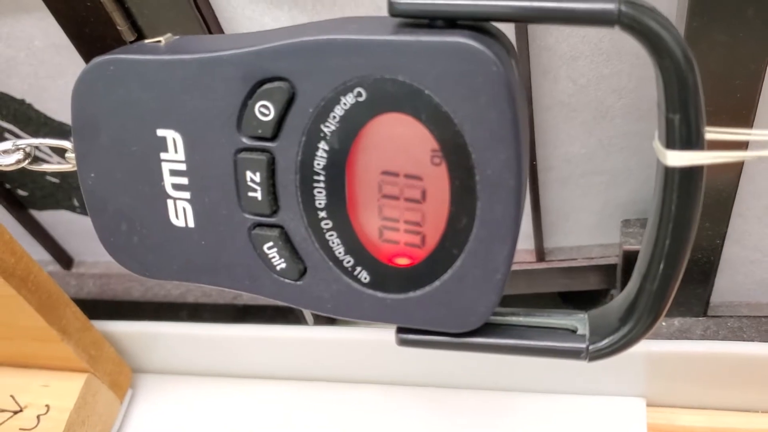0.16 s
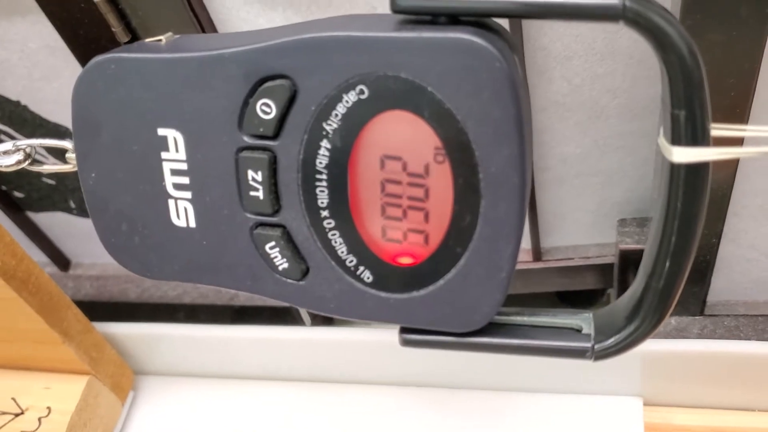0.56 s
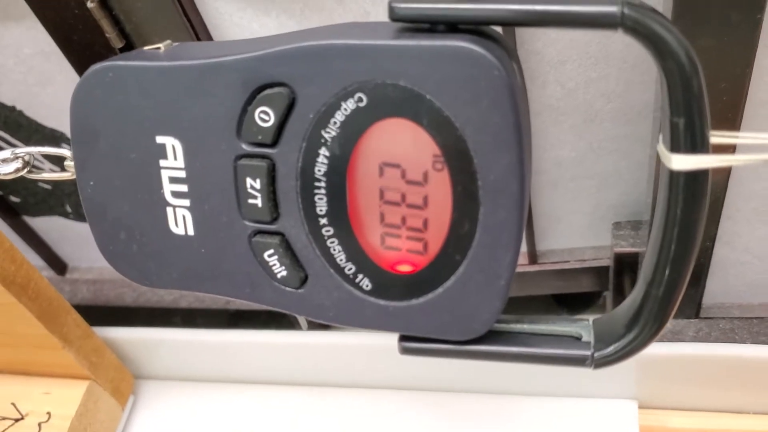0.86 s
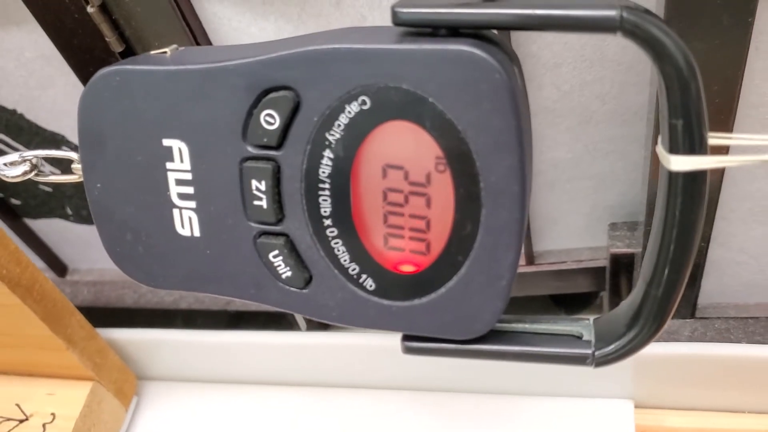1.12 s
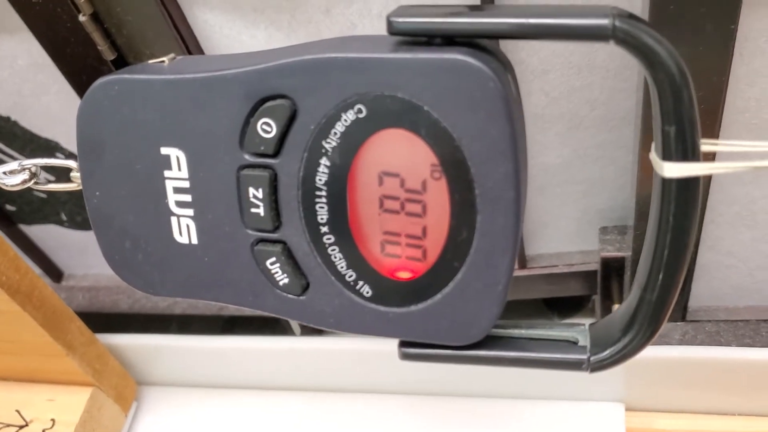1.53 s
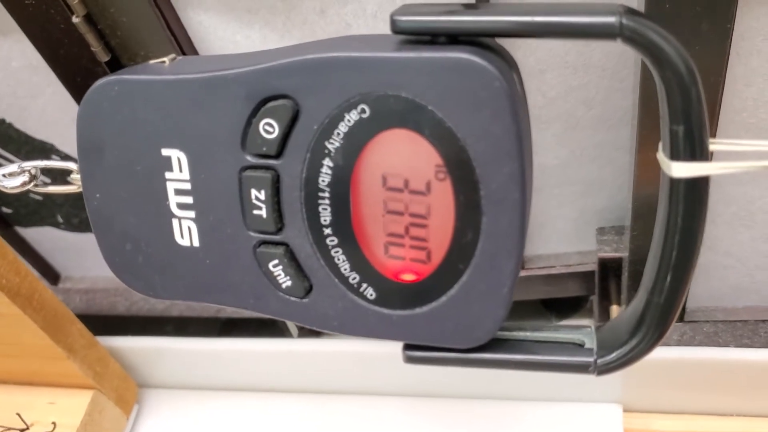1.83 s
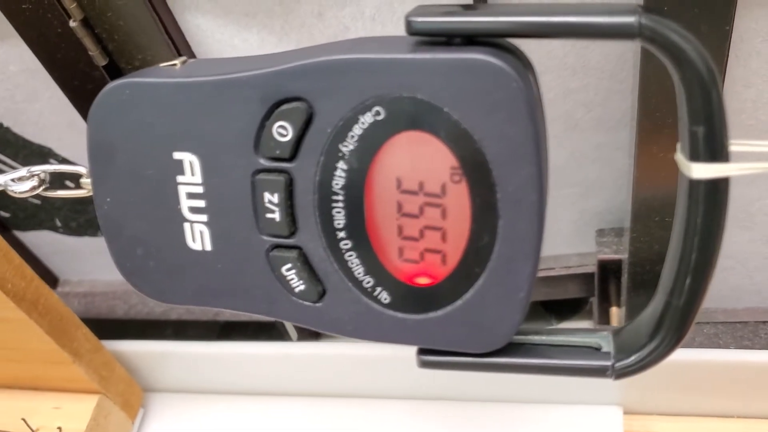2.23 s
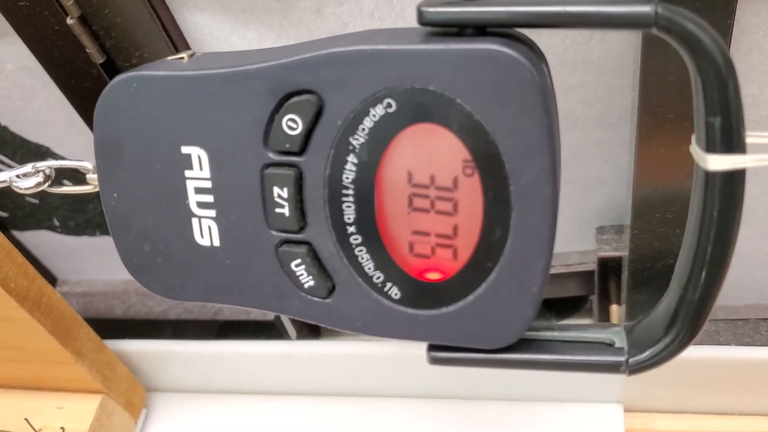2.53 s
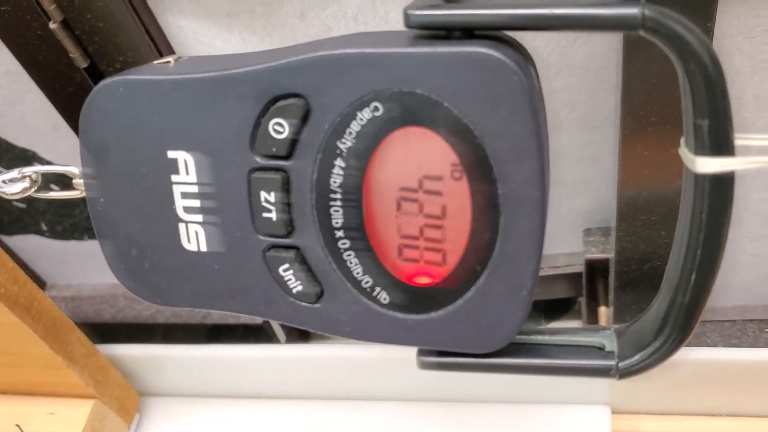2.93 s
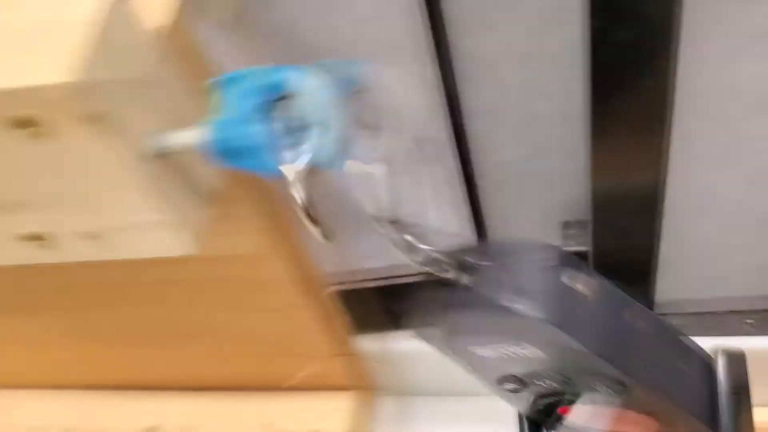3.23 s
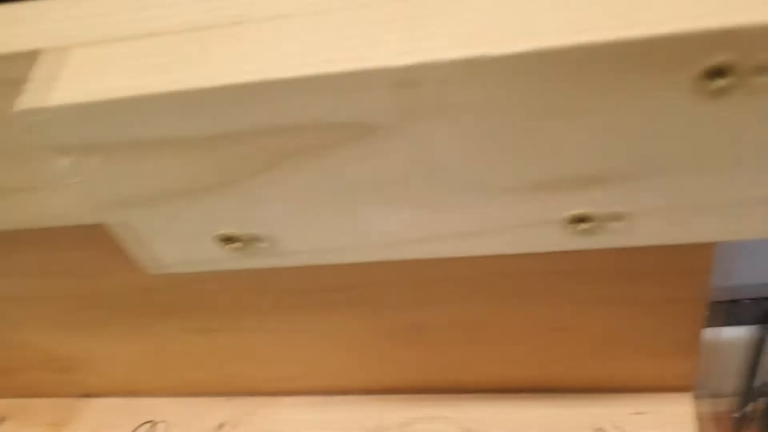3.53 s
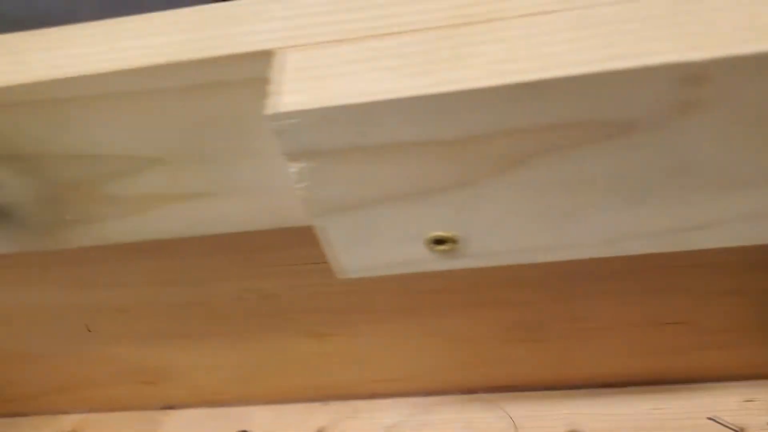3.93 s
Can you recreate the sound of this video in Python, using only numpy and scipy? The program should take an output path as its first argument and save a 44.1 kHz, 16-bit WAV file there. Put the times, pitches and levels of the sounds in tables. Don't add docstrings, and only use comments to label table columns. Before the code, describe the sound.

Close stereo pickup in a small workshop with steady low ventilation hum. A line under growing tension gives faint ticks, creaks and small metallic pings. Just before three seconds it parts with a bright, dry crack; a hanging scale, hook and chain then knock rapidly against a wooden frame, with a second heavy cluster, a late sharp click and soft final taps. The background hum dips after the snap.

```python
import sys
import numpy as np
from scipy import signal
from scipy.fft import rfft, irfft, next_fast_len
from scipy.io import wavfile

SR = 44100
rng = np.random.default_rng(int(sys.argv[2]) if len(sys.argv) > 2 else 0)


def boost_factor(decibels):
    exponent = np.asarray(decibels, float) / 20
    return 10 ** exponent


def transcribe(u):
    v = np.clip(np.atleast_2d(u).T, -1, 1)
    q = np.round(v * 32767).astype(np.int16)
    wavfile.write(sys.argv[1], SR, q)


N = 179433


def rms_one(x):
    return x / np.sqrt(np.mean(x ** 2) + 1e-20)


def at_hz(points, hz):
    table_hz, value = np.transpose(points)
    return np.interp(np.log(np.maximum(hz, 1)), np.log(table_hz), value)


def add(out, sound, s, pan_db):
    i = round(s * SR)
    sound = sound[:, :N - i]
    sides = boost_factor(np.array([[pan_db / 2], [-pan_db / 2]]))
    out[:, i:i + sound.shape[1]] += sound * sides


# f/Hz, left-right correlation [-1..1]
FIELD_LIKENESS = [(60, 0.93), (180, 0.98), (550, 0.58), (1650, 0.04), (4970, 0.05), (15000, -0.14)]


def stereo_noise(gain_at, alike_at=lambda hz: at_hz(FIELD_LIKENESS, hz)):
    size = next_fast_len(N)
    hz = np.arange(size // 2 + 1) * SR / size
    mid, side = rfft(rng.standard_normal((2, size)))
    alike = np.clip(alike_at(hz), -1, 1)
    pair = np.sqrt(1 + alike) * mid + np.sqrt(1 - alike) * side * [[1], [-1]]
    return rms_one(irfft(pair * gain_at(hz), size)[:, :N])


# f/Hz, density level/dB
AIR_SPECTRUM = [(15, -63), (25, -11.5), (70, -3.5), (124, -8.5), (159, -16.5), (221, -23), (391, -28),
                (447, -24), (630, -28.5), (872, -33), (1140, -32.5), (1230, -33), (2400, -58.5),
                (3120, -109), (5280, -120)]
# f/Hz, density level/dB
OUTLET_HISS = [(1200, -43), (2000, -7.5), (3200, -6), (3700, -11.5), (5200, -10.5), (5900, -2), (7300, -3),
               (8500, 0.5), (9500, -4.5), (10200, -14.5), (14000, -12.5), (16000, -17)]
# f/Hz, bandwidth/Hz, rms level/dB, tone share [0..1]
DUCT_BOOMS = [(59.07, 7.7, -44.5, 0.22), (72.37, 2.6, -47, 0.78), (154.5, 14.6, -52.5, 0.02),
              (200, 7.7, -76.5, 0.37)]
# f/Hz, rms level/dB
MOTOR_TONES = [(360.7, -68.5), (452.2, -62.5), (527.6, -69.5), (720, -71.5), (904.4, -71.5), (1200, -67.5),
               (1319, -69.5)]


def ventilation():
    t = np.arange(N) / SR
    out = boost_factor(-46) * stereo_noise(lambda hz: boost_factor(at_hz(AIR_SPECTRUM, hz)))
    out += boost_factor(-71) * stereo_noise(lambda hz: boost_factor(at_hz(OUTLET_HISS, hz)))
    for centre, width, db, tone in DUCT_BOOMS:
        steady = np.sqrt(2) * np.sin(2 * np.pi * (centre * t + rng.random()))
        waver = stereo_noise(lambda hz: 1 / (1 + (2 * (hz - centre) / width) ** 2))
        out += boost_factor(db) * (np.sqrt(tone) * steady + np.sqrt(1 - tone) * waver)
    for centre, db in MOTOR_TONES:
        phase = rng.random((2, 1)) * 0.74
        steady = np.sqrt(2) * np.sin(2 * np.pi * (centre * t + phase))
        waver = stereo_noise(lambda hz: 1 / (1 + ((hz - centre) / 3.5) ** 2))
        out += boost_factor(db) * (0.39 * steady + 0.61 * waver)
    return out * boost_factor([[-.4], [.4]])


# t/s, depth/dB, attack/s
GAIN_DUCKS = [
    (2.885, 6.5, .016),
    (3.05, 15.5, 0.2),
    (3.52, 15.5, 0.19),
    (3.81, 16.5, 0.027),
]


def gain_db():
    rest_db, release_db_per_s = 1.0, 13.5
    t = np.arange(N) / SR
    ducks = []
    for s, depth_db, attack_s in GAIN_DUCKS:
        sinking = depth_db * (t - s) / attack_s
        recovering = depth_db - release_db_per_s * (t - s - attack_s)
        ducks.append(np.minimum(sinking, recovering))
    return rest_db - np.maximum(np.max(ducks, axis=0), 0)


# f/Hz, T60/s
WORKSHOP_T60 = [(150, 0.46), (700, 0.66), (3000, 0.29), (9000, 0.31), (16000, 0.25)]


def room(x):
    t, tail = np.arange(SR // 2) / SR, 0
    for low in 100 * 2. ** np.arange(8):
        band = signal.butter(2, [low, min(2 * low, .45 * SR)], "band", fs=SR, output="sos")
        noise = signal.sosfilt(band, rng.standard_normal((2, len(t))))
        tail = tail + noise * boost_factor(-60 * t / at_hz(WORKSHOP_T60, low * np.sqrt(2)))
    tail = tail * np.clip(t / 0.0013, 0, 1)
    tail = boost_factor(-9.5) * tail / np.sqrt(np.sum(tail ** 2) / 2)
    return signal.fftconvolve(x, tail, axes=1)[:, :N]


# f/Hz, density level/dB
ANSWER_COLOUR = [(180, -41), (300, -9.5), (870, -2), (1840, -14), (2280, -7), (2650, -7.5), (3950, -7),
                 (13800, -3.5), (16000, -10.5)]
ANSWER_S = 2.894


def crack_answer():
    swell_s, hold_s, fade_s = 0.03, 0.047, 0.21
    start_db, top_db, hold_loss_db = -35, -24, 3
    fade_db_per_s, cut_db_per_s = 103.5, 396.5
    held_db = top_db - hold_loss_db
    faded_db = held_db - fade_db_per_s * fade_s
    s = ANSWER_S + np.cumsum([-.003, .003, swell_s, hold_s, fade_s, 1])
    corners_db = [-100, start_db, top_db, held_db, faded_db, faded_db - cut_db_per_s]
    level_db = np.interp(np.arange(N) / SR, s, corners_db)
    wash = stereo_noise(lambda hz: boost_factor(at_hz(ANSWER_COLOUR, hz)), lambda hz: 0.083 + 0 * hz)
    return boost_factor(level_db) * wash


def burst(length_ms, alike, swell, size=12000):
    t = np.arange(size) / SR / (length_ms / 1000)
    shared, left, right = rng.standard_normal((3, size))
    noise = np.sqrt(alike) * shared + np.sqrt(1 - alike) * np.array([left, right])
    return noise * (4 * t) ** swell * np.exp(-4 * t)


def contacts(table, width, alike, swell):
    near, far = np.zeros((2, 2, N))
    for s, db, hz, length_ms, pan_db in table:
        octaves = max(width[0] + width[1] * (db + 30), 0.079)
        edges = np.clip(hz * 2 ** (np.array([-.5, .5]) * octaves), 30, .49 * SR)
        band = signal.butter(2, edges, "band", fs=SR, output="sos")
        sound = signal.sosfilt(band, burst(length_ms, alike, swell))
        sound = boost_factor(db + 4.0) * sound / np.abs(sound).max()
        click = rms_one(signal.sosfilt(band, np.arange(sound.shape[1]) == 0))
        click = click * np.sqrt(np.mean(sound ** 2))
        add(near, sound, s, pan_db)
        add(far, np.array([click, click]), s, pan_db / 2)
    return near, far


# t/s, peak level/dB, centre f/Hz, length/ms, left-right difference/dB
RIG_CREAKS = [
    (.720, -44.5, 1200, 7.1, 3),
    (.728, -62.5, 1900, 23, 5),
    (1.259, -63, 2100, 3, 11),
    (1.296, -72, 2300, 43, 10),
    (1.299, -54.5, 2200, 3.7, 11),
    (2.346, -65, 4550, 12, 3),
]
# t/s, peak level/dB, centre f/Hz, length/ms, left-right difference/dB
METAL_PINGS = [
    (.832, -56.5, 3520, 5.7, 9),
    (.937, -68, 2000, 5, 7),
    (1.08, -69, 2200, 5.8, 12),
    (1.69, -60, 1510, 9.4, 2),
    (2.345, -56.5, 8660, 8.2, -2),
    (2.345, -64, 14500, 14, -2),
    (2.53, -70, 15000, 18, 0),
    (2.594, -49, 3030, 15, 1),
    (2.595, -60, 5550, 4.8, 11),
]
# t/s, peak level/dB, centre f/Hz, length/ms, left-right difference/dB
KNOT_SLIPS = [
    (.829, -68, 6140, 95, 19),
    (.8315, -48.5, 8200, 2, 15),
    (2.345, -63.5, 5500, 14, 5),
]
# t/s, peak level/dB, centre f/Hz, length/ms, left-right difference/dB
LINE_SQUEALS = [
    (2.15, -80, 2310, 310, 14),
    (2.66, -76.5, 2310, 230, 7),
]


def straining_rig():
    parts = [(RIG_CREAKS, (0.6, 0)), (METAL_PINGS, (0.17, 0)), (KNOT_SLIPS, (6.2, 0.11)),
             (LINE_SQUEALS, (.05, 0))]
    return np.sum([contacts(table, width, alike=0.12, swell=1.76) for table, width in parts], axis=0)


# t/s, peak level/dB, centre f/Hz, length/ms, left-right difference/dB
DULL_THUMPS = [
    (2.887, -37, 256, 14, 0),
    (2.893, -40, 82.5, 50, 0),
    (2.96, -35, 184, 91, 0),
    (3.05, -37, 78, 120, 0),
    (3.1, -45.5, 165, 53, 0),
    (3.40, -40.5, 255, 43, 0),
    (3.43, -42, 87, 44, 0),
    (3.5, -49.5, 180, 140, 0.018),
    (4.02, -54, 175, 52, 0),
]


def thumps():
    return contacts(DULL_THUMPS, (1.78, 0.063), alike=0.97, swell=1.18)[0]


# t/s, rms level/dB
FRAME_JOLTS = [
    (2.9, -45),
    (3.05, -40),
    (3.22, -42.5),
    (3.3, -41.5),
    (3.38, -46.5),
    (3.5, -45.5),
    (3.82, -54.5),
]


def shudder_db():
    rise_db_per_s, fall_db_per_s = 87, 76
    t = np.arange(N) / SR
    jolts = [db - np.maximum(rise_db_per_s * (s - t), fall_db_per_s * (t - s)) for s, db in FRAME_JOLTS]
    return np.where(t > ANSWER_S, np.max(jolts, axis=0), -200)


# f/Hz, level under blows/dB, level under shudder/dB, T60/s
FRAME_MODES = [(188, -15, -5.5, 0.065), (232, -22.5, -10, 0.11), (324.4, -23, -13, 0.095),
               (540, -21.5, -21.5, 0.052), (578, -10, -5.5, 0.14), (621.5, -8, -18, 0.15),
               (658, -13.5, -3.5, 0.28), (717.6, -2.5, -3, 0.084), (807, -8, -18.5, 0.15),
               (908, 7, -13, 0.02), (965, -24, -12.5, 0.02), (1102, -7, 7.5, 0.041),
               (1213, -1.5, -2.5, 0.084), (1330, 3.5, -15, 0.041), (1400, 0, 0, 0.039),
               (1600, 2, -7, 0.013), (1860, 17.5, -21, 0.0043), (2400, -10.5, -33, 0.0088)]
# t/s, peak level/dB, length/ms, left-right difference/dB
SCALE_KNOCKS = [(2.889, -23.5, 6.1, -7), (2.961, -15.5, 15.4, 2), (2.975, -19.5, 8.9, 2),
                (3.03, -27, 3.8, 5), (3.054, -22, 17, -2), (3.092, -23, 27, 2), (3.12, -34.5, 6.1, 4),
                (3.167, -30.5, 7.9, -0.5), (3.2, -44, 22, 5), (3.24, -29.5, 15, 6), (3.285, -33.5, 30, 1),
                (3.334, -31.5, 11, 6), (3.39, -29, 17, 13), (3.405, -17, 6.7, -3.5), (3.427, -14, 10, 3.5)]
# t/s, peak level/dB, length/ms, left-right difference/dB
SCALE_BUMPS = [
    (3.438, -16, 14.8, 2),
    (3.462, -30, 16, -8),
    (3.486, -15, 17, 0),
    (3.504, -36, 13, 5.5),
    (3.525, -30, 8.2, 3),
    (3.558, -27.5, 4.7, -4),
    (3.633, -36.5, 7.6, -1),
    (3.68, -36.5, 8.4, 2),
]
# t/s, peak level/dB, length/ms, left-right difference/dB
RESTING_TAPS = [
    (3.82, -29, 9.1, -4),
    (3.862, -39, 16, 1),
    (3.89, -37, 6.8, -3),
    (3.936, -34.5, 12.4, -3),
    (4.012, -35, 14, -3.5),
    (4.045, -48, 12, -11),
]


def frame():
    out = np.zeros((2, N))
    grains = (rng.random(N) < 220 / SR) * rng.random(N)
    shudder = boost_factor(shudder_db()) * (0.67 + rms_one(signal.lfilter([1], [1, -.99], grains)))
    kinds = [(SCALE_KNOCKS, 1375), (SCALE_BUMPS, 900), (RESTING_TAPS, 680)]
    blows = [(row, hard_hz) for table, hard_hz in kinds for row in table]
    for hz, mode_db, grain_db, t60 in FRAME_MODES:
        alike = 1 / (1 + (hz / 420) ** 3)
        shared, left, right = rng.standard_normal((3, N))
        rubbing = np.sqrt(alike) * shared + np.sqrt(1 - alike) * np.array([left, right])
        force = shudder * boost_factor(grain_db - 32.5) * rubbing
        for (s, db, length_ms, pan_db), hard_hz in blows:
            softness = (1 + (hz / hard_hz) ** 8) * length_ms / 9
            reach = boost_factor(db + mode_db - 24) / np.sqrt(softness)
            add(force, reach * burst(length_ms, alike, 1.16, size=3500), s - .002, pan_db)
        r, w = boost_factor(-60 / (t60 * SR)), 2 * np.pi * hz / SR
        out += signal.lfilter([0, np.sin(w)], [1, -2 * r * np.cos(w), r * r], force + 1e-18)
    return out * boost_factor([[1.2], [-1.2]])


# t/s, peak level/dB, centre f/Hz, length/ms, left-right difference/dB
SMALL_CONTACTS = [(3.267, -35, 1980, 8.5, 4), (3.335, -32, 1930, 5.4, 4), (3.354, -33, 2510, 13, 2.5),
                  (3.37, -40, 4300, 18, -4), (3.531, -30.5, 4500, 2.5, 0), (3.443, -26.5, 2160, 11, 3),
                  (3.505, -30, 2090, 8, 2.5), (3.658, -43.5, 2000, 12, 2), (3.677, -46.5, 7855, 4.8, 6),
                  (3.677, -48, 2450, 11, 5), (3.733, -59.5, 3700, 7, 4), (3.776, -50, 2090, 11.6, 3),
                  (3.822, -47, 5000, 58, 6), (3.887, -43.5, 4590, 6.4, 5), (3.89, -56.5, 2400, 11, 10),
                  (3.983, -60, 4600, 5.6, 3), (3.986, -53, 2030, 9.7, 9), (3.996, -51.5, 1800, 8.4, 5.5),
                  (4.023, -49, 4100, 2, 0), (4.026, -57.5, 1400, 7.3, 0), (4.04, -62, 3530, 16, 4)]


def small_clatter():
    return contacts(SMALL_CONTACTS, (1.28, 0.012), alike=0.2, swell=0.81)


# t/s, peak level/dB, centre f/Hz, length/ms, left-right difference/dB
HARD_CONTACTS = [(3.09, -24.5, 1860, 11, 2.5), (3.092, -46, 7000, 7, 6), (3.117, -30, 8700, 10.5, 5),
                 (3.159, -29.5, 8500, 5.7, 0.5), (3.172, -28, 2770, 5.3, 8.5), (3.206, -14.5, 4100, 4, 6.5),
                 (3.2195, -35, 9720, 3, -7), (3.233, -22.5, 7260, 9.5, -3.5), (3.287, -10, 11000, 3.4, 1),
                 (3.403, -19, 4400, 10.2, 2.5), (3.426, -21, 1780, 16, 3), (3.439, -23.5, 8600, 13.8, 0.5),
                 (3.464, -30, 9460, 5.5, -11.5), (3.485, -26.5, 8000, 6, -3), (3.5, -33, 6800, 6.3, 4),
                 (3.522, -32, 8500, 6.5, -5), (3.554, -22, 5860, 12, -2.5), (3.813, -14, 10100, 6.6, 2.5),
                 (3.817, -34, 1090, 10.2, -0.5)]


def hook_and_chain():
    return contacts(HARD_CONTACTS, (1.83, 0.1), alike=0.11, swell=1.24)


# t/s, peak level/dB, centre f/Hz, length/ms, left-right difference/dB
LINE_PARTING = [
    (2.886, -33, 10460, 2.9, -3),
    (2.888, -12.5, 7000, 2.4, 2),
    (2.8895, -12.5, 8900, 2.75, 14),
]


def parting_line():
    return contacts(LINE_PARTING, (0.74, 0.41), alike=0.2, swell=2.7)[0]


def scene():
    creaks, creaks_far = straining_rig()
    wood = frame()
    small, small_far = small_clatter()
    hard, hard_far = hook_and_chain()
    bright = signal.lfilter([1, -.3], [1], hard + parting_line())
    echo = room(boost_factor(5.5) * creaks_far + small_far + hard_far + boost_factor(-8) * wood)
    near = creaks + small + bright + wood + thumps()
    return boost_factor(gain_db()) * ventilation() + near + echo + crack_answer()


def top_cut(x):
    return signal.sosfilt(signal.butter(12, 17000, fs=SR, output="sos"), x)


def record(dry):
    limit = 0.6
    rounded = limit * np.tanh(dry / limit)
    thinned = signal.sosfilt(signal.butter(2, 32, "high", fs=SR, output="sos"), rounded)
    shelf = signal.ellip(10, .5, 28, 16000 * .995, fs=SR, output="sos")
    mix = signal.sosfilt(shelf, thinned)
    return top_cut(mix)


dry = scene()
out = record(dry)
transcribe(out)
```